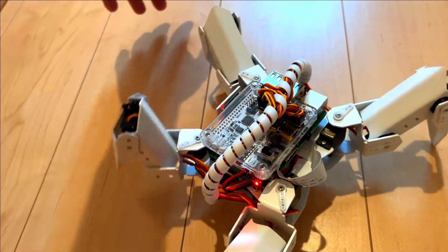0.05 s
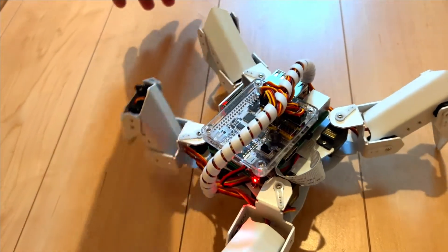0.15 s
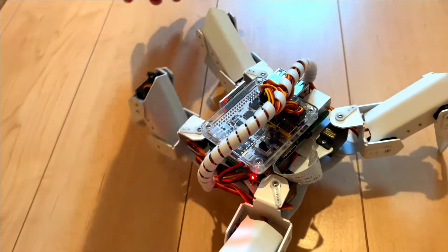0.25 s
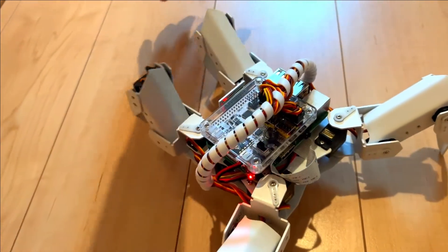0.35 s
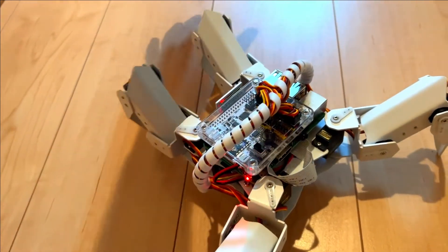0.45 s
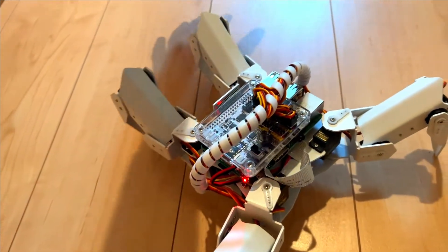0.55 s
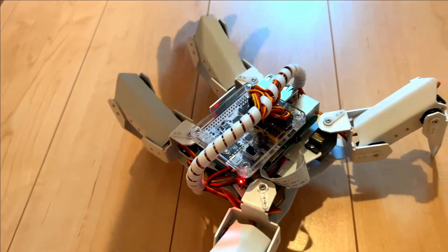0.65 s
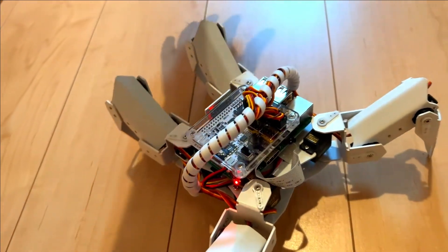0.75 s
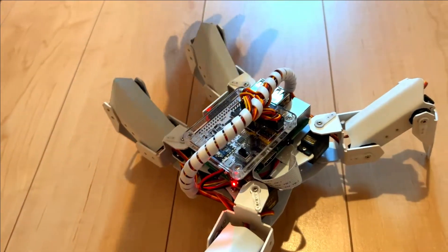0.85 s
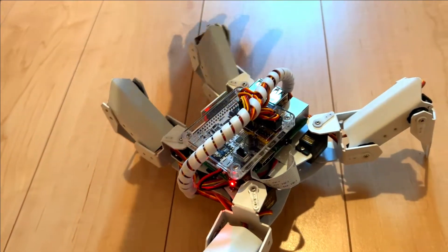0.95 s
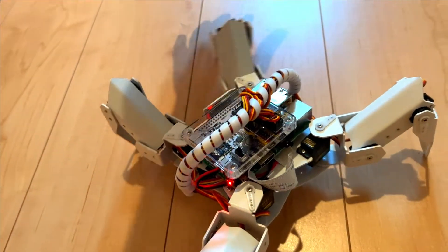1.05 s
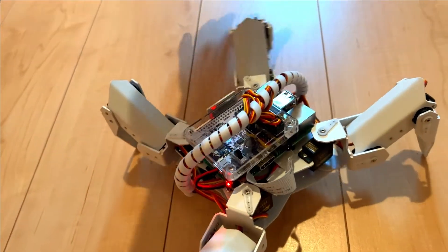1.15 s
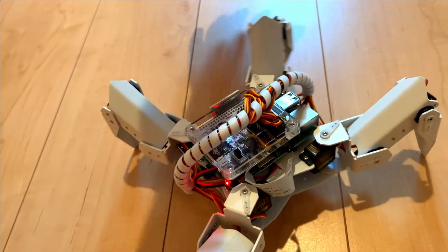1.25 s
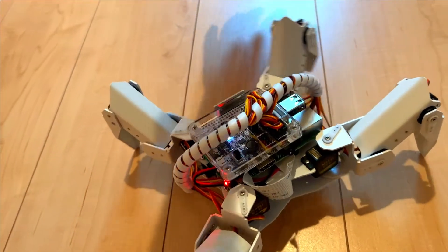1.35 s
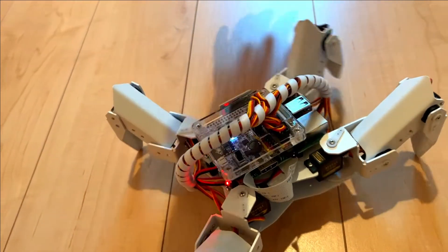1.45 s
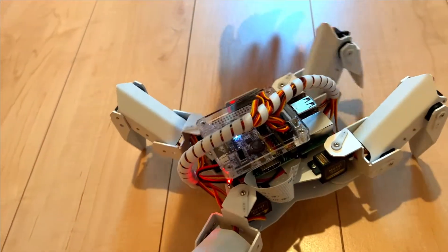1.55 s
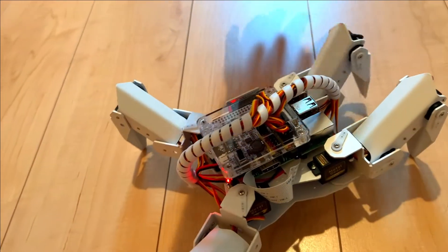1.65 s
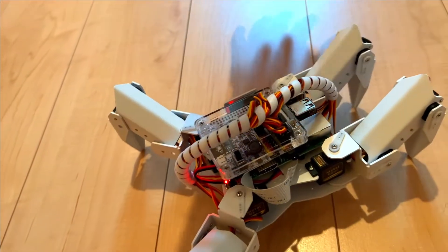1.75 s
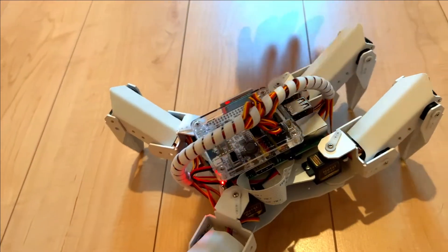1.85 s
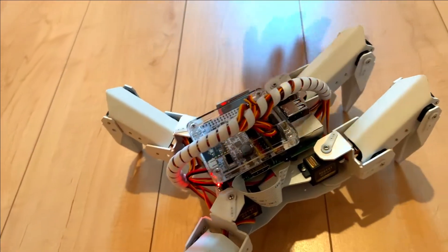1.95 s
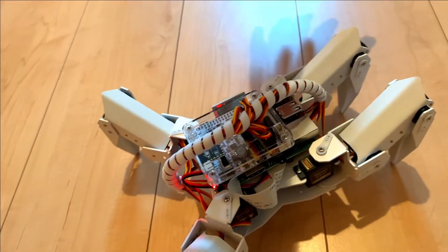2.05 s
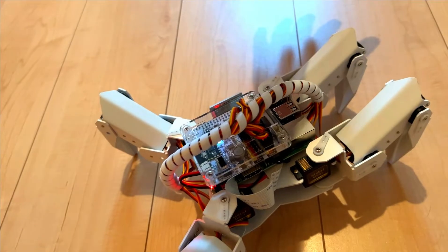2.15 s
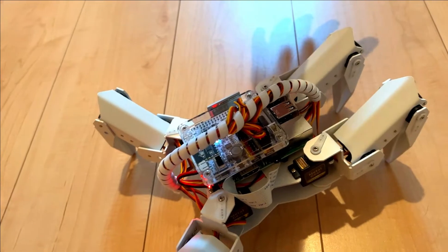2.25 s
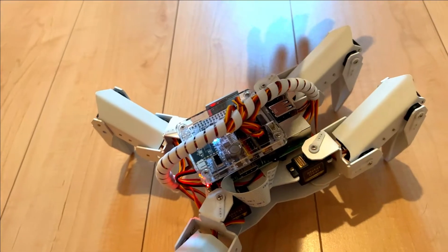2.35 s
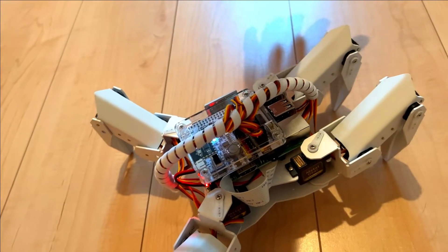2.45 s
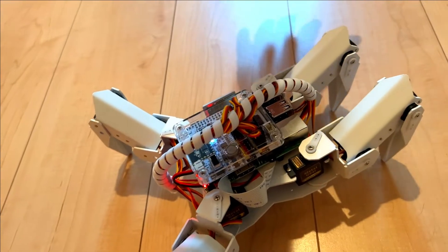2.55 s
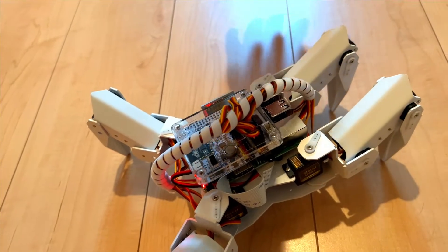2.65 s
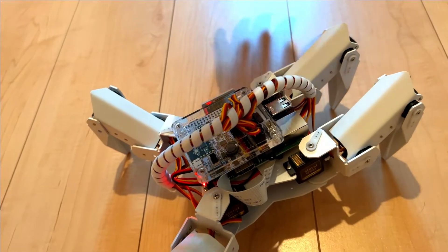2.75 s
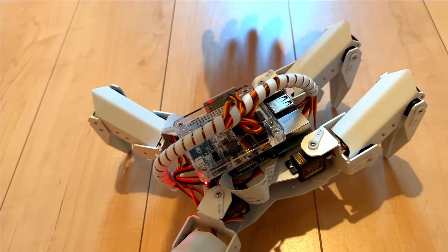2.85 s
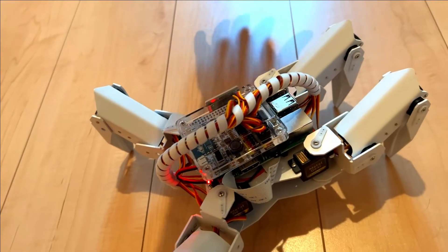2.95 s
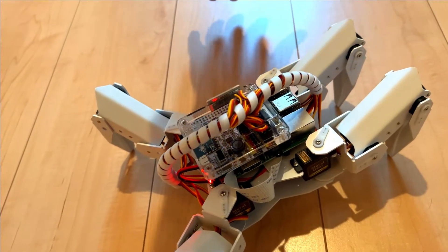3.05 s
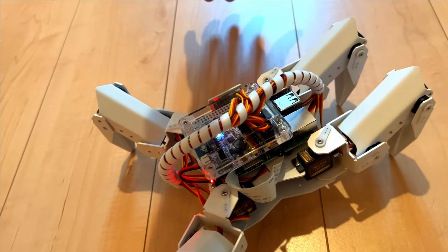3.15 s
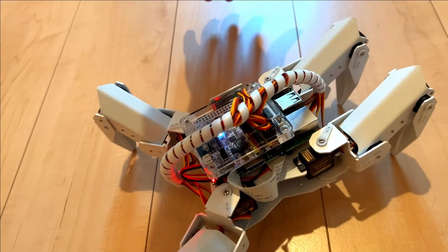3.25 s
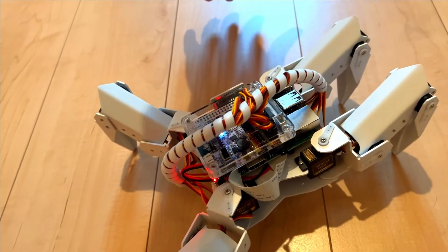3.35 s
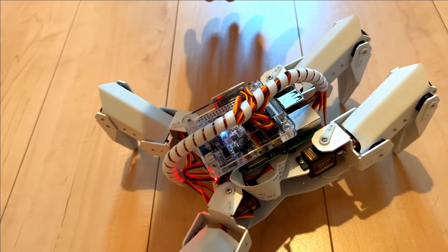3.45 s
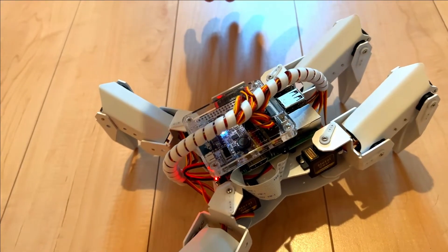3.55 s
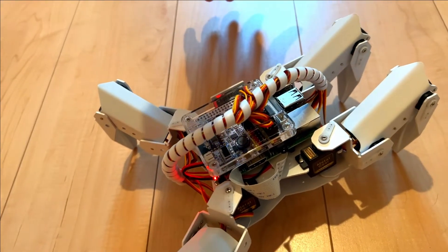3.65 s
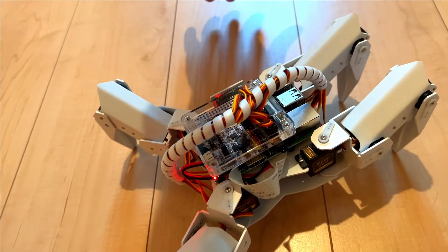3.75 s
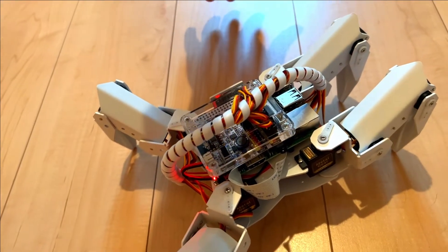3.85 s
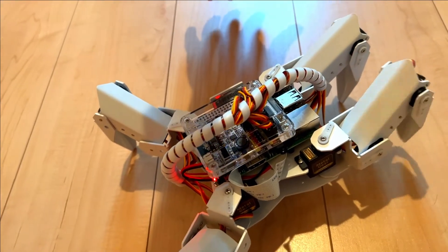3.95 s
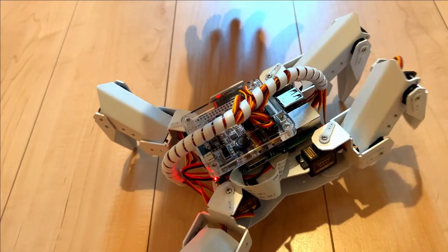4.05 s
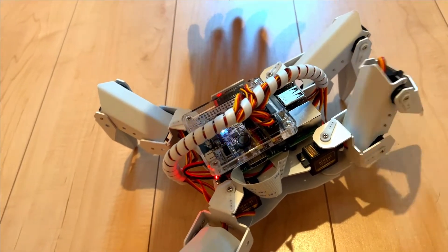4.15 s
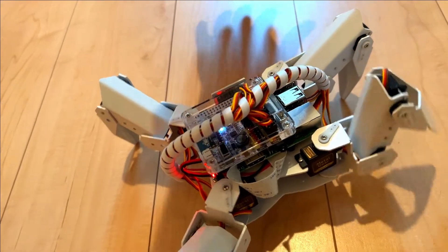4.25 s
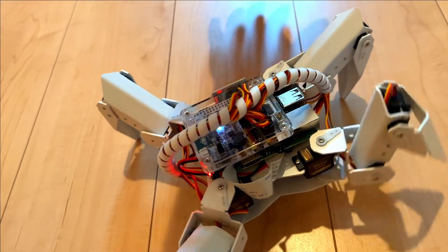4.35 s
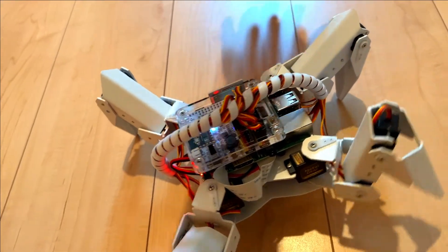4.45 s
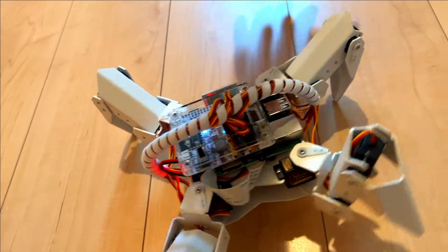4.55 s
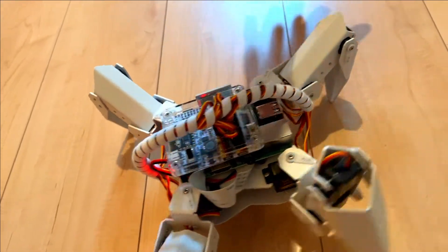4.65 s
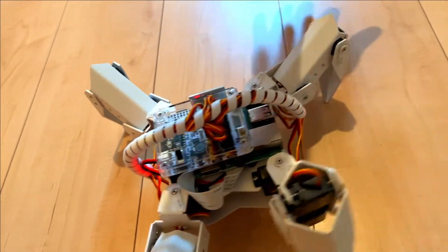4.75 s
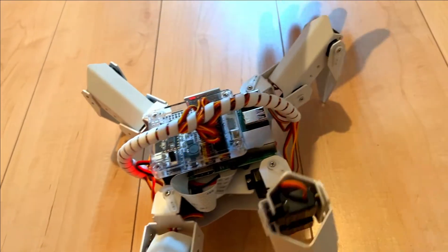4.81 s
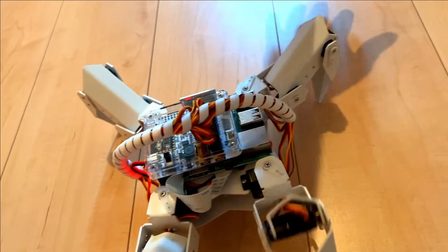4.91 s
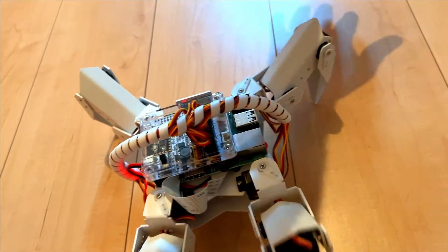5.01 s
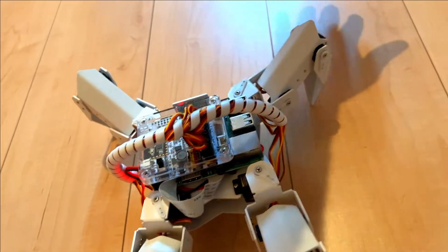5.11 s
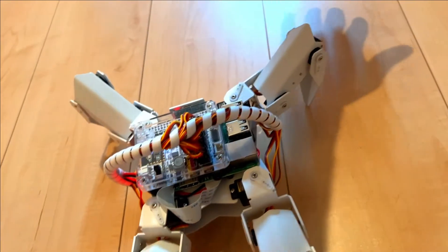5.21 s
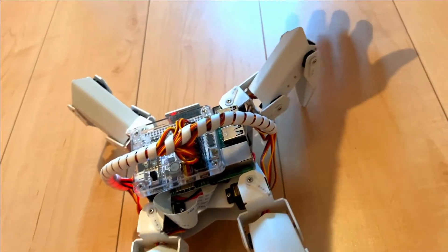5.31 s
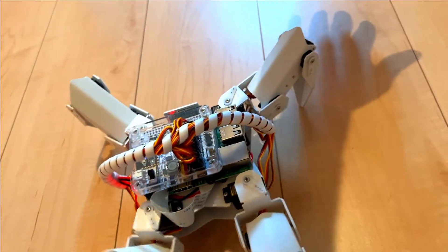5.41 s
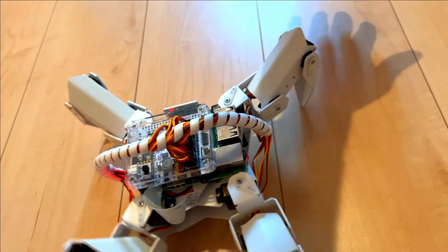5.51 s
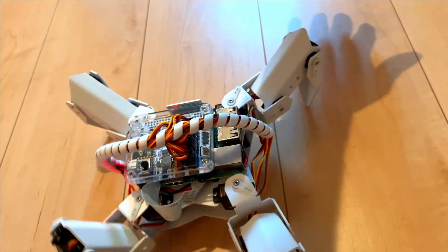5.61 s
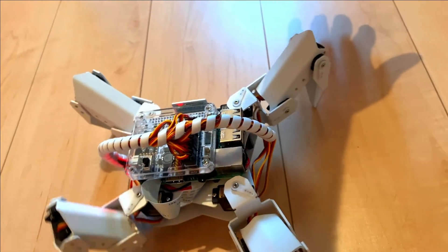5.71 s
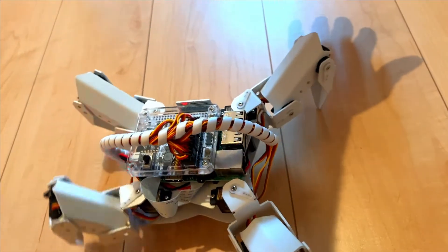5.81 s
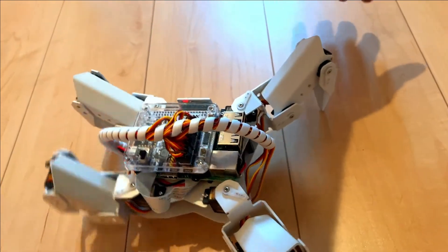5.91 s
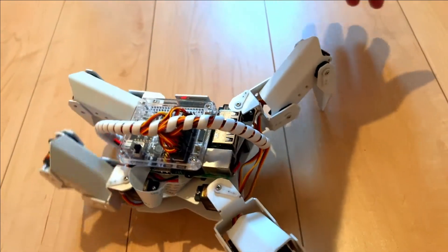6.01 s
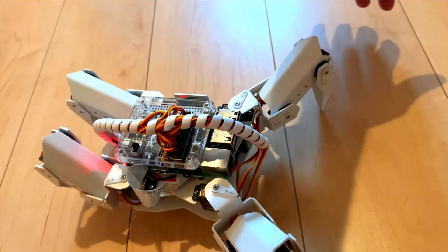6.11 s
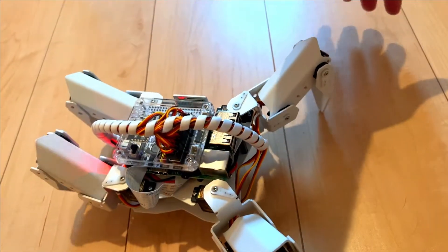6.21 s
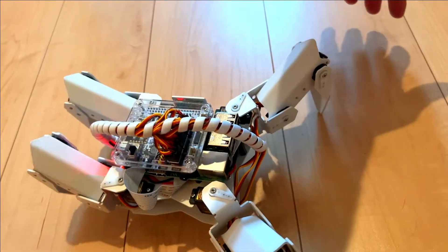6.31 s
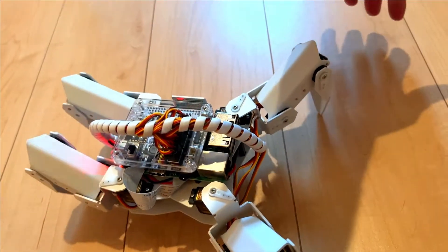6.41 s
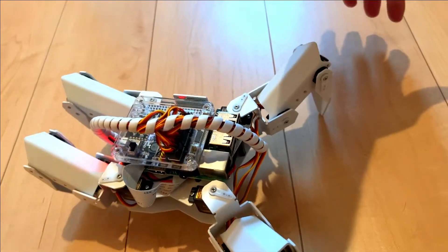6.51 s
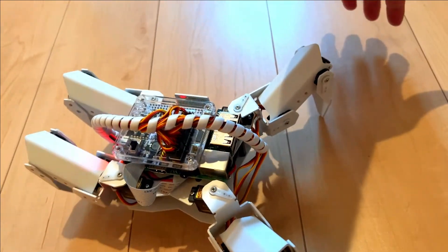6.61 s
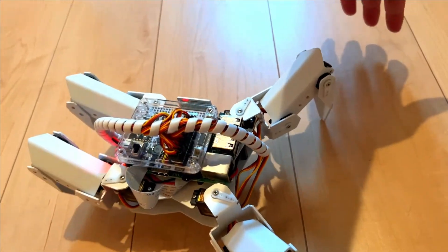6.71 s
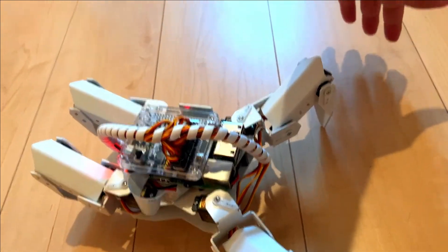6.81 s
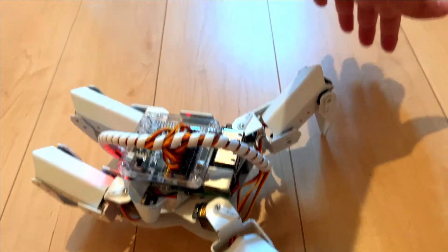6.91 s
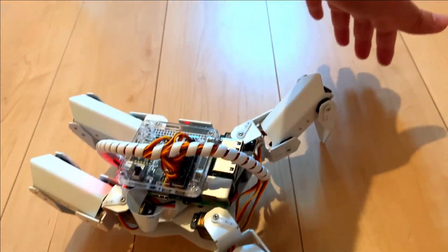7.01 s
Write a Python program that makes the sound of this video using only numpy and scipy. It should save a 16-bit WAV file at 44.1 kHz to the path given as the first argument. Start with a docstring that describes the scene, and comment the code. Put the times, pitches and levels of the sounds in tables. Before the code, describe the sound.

A small four-legged robot walks on a wooden floor in two bursts of rasping, squealing servos and hard plastic foot knocks, with a quiet pause between.

```python
"""Small walking robot

A four-legged robot takes two strides on a wooden floor, with a rest between them.
Servo gears rasp, tick and squeal: random tooth impacts ring in case resonances, tones scatter in pitch.
The frame shudders as filtered patter; plastic feet knock on the boards as decaying modes and noise bursts.
Holding servos whine as beating sines; a quiet living room adds coloured noise and echoes."""
import sys
import numpy as np
from scipy import signal
from scipy.fft import rfft, irfft, next_fast_len
from scipy.io import wavfile
from scipy.ndimage import uniform_filter1d, map_coordinates

SR = 44100
rng = np.random.default_rng(int(sys.argv[2]) if len(sys.argv) > 2 else 0)


def int16_out(signal):
    """Quantize to a 16-bit WAV file."""
    q = np.round(np.clip(np.atleast_2d(signal).T, -1, 1) * 32767)
    wavfile.write(sys.argv[1], SR, q.astype(np.int16))


N = 311787
TIME = np.arange(N) / SR


def from_db(db):
    """Decibels to amplitude gain."""
    return np.exp(np.asarray(db) * (np.log(10) / 20))


def rms_one(x):
    """Scale to unit power."""
    return x / np.sqrt(np.mean(x ** 2) + 1e-20)


def at_hz(points, hz, axis=1):
    """Read a table column, interpolated over log frequency."""
    table = np.array(points)
    return np.interp(np.log(np.maximum(hz, 1)), np.log(table[:, 0]), table[:, axis])


def drift(rate_hz, size=N):
    """Smooth random curve of rms 1 that changes about rate_hz times a second."""
    knots = np.clip(rng.standard_normal(N // 32), -2, 2)
    coarse_s = TIME[:size:16]
    curve = map_coordinates(knots, [coarse_s * rate_hz], order=3, mode="wrap")
    return np.interp(TIME[:size], coarse_s, rms_one(curve))


def add(track, start_s, sound):
    """Mix a sound into a track at a time."""
    start = max(round(start_s * SR), 0)
    track[:, start:start + sound.shape[-1]] += sound[..., :N - start]


# Stereo likeness. Each row: frequency in Hz, left-right correlation (limited where it is read).
LIKENESS = [(30, .9), (250, 0.87), (600, 0.47), (2000, 0.38), (4300, 0.44), (5400, -0.074), (7500, 1),
            (10000, -1.96), (13500, 1), (15500, -.3)]


def likeness(hz):
    """Left-right correlation at a frequency, short of full agreement or opposition."""
    return np.clip(at_hz(LIKENESS, hz), -.98, .98)


def coloured(pair, spectrum):
    """Two unrelated signals become left and right with this spectrum, falling steeply beyond its ends; rms 1."""
    length = pair.shape[-1]
    size = next_fast_len(length, real=True)
    hz = np.fft.rfftfreq(size, 1 / SR) + 1
    low_hz, high_hz = spectrum[0][0], spectrum[-1][0]
    skirts = 1 / np.sqrt((1 + (low_hz / hz) ** 8) * (1 + (hz / high_hz) ** 8))
    mid, side = rfft(pair, size) * from_db(at_hz(spectrum, hz)) * skirts
    alike = likeness(hz)
    sides = np.sqrt(1 + alike) * mid + np.sqrt(1 - alike) * side * [[1], [-1]]
    return rms_one(irfft(sides, size)[:, :length])


def grains(per_s, spread_db):
    """Random tiny impacts of uneven size and either sign; rms 1."""
    sizes = from_db(spread_db * np.minimum(rng.exponential(1, N), 4))
    signed = sizes * rng.choice([-1, 1], N)
    return rms_one(signed * (rng.random(N) < per_s / SR))


def rattled(clicks, t60_s):
    """Clicks ring in a shell with many close modes (decaying noise), heard along two paths; rms 1."""
    t = TIME[:SR // 8]
    shell = rng.standard_normal((2, len(t))) * from_db(-60 * t / t60_s)
    return rms_one(signal.fftconvolve(clicks[None], shell)[:, :N])


def snap(spectrum, t60_s):
    """A hard plastic contact: a burst of dense modes, as coloured noise, that dies at once."""
    t = TIME[:SR // 8]
    return coloured(rng.standard_normal((2, len(t))), spectrum) * from_db(-60 * t / t60_s)


def strokes(rows, attack_s, fall_db_per_s):
    """Summed power of movements: each rises quickly, changes steadily with the load, then dies away freely."""
    t, power = TIME[::32], 0
    for start_s, end_s, start_db, end_db in rows:
        fall_db = fall_db_per_s * np.maximum(t - end_s, 0)
        db = np.interp(t, [start_s, end_s], [start_db, end_db]) - fall_db
        rise = np.clip((t - start_s) / attack_s, 0, 1)
        power = power + (rise * from_db(db)) ** 2
    return np.interp(TIME, t, power)


# Still room. Each row: frequency in Hz, relative level in dB per Hz.
AIR_COLOUR = [(13, -47.5), (22, -14), (86, 0), (153, -11.5), (301, -14.5), (325, -20.5), (368, -13),
              (524, -27), (609, -16.5), (727, -33.5), (1230, -32), (1510, -35.5), (2040, -39),
              (9000, -48.5), (11700, -89.5), (19800, -120)]


def room_air(level_db=-63):
    """The still room: steady coloured noise."""
    return from_db(level_db) * coloured(rng.standard_normal((2, N)), AIR_COLOUR)


# Two holding servo drivers. Each row: frequency in Hz, level in dB, phase between the sides in radians.
WHINE = [(15612, -57, 1.8), (15631, -49.5, 2.1)]
DRIVE_HZ, DRIVE_DB, DRIVE_APART_RAD = 15570, -55.5, 1.8  # third driver, only while the legs move


def whine(effort, wander_hz=1.5, strain_hz=24.0, waver_db=0.9, shake_db=2.0, moving_db=-60):
    """The holding servos beat against each other; pitch and level are shaken while the legs move."""
    moving = np.clip(effort / from_db(moving_db), 0, 1)
    voices = [(hz, from_db(db), apart_rad) for hz, db, apart_rad in WHINE]
    voices.append((DRIVE_HZ, from_db(DRIVE_DB) * moving, DRIVE_APART_RAD))
    out = np.zeros((2, N))
    for hz, gain, apart_rad in voices:
        pitch_hz = hz + wander_hz * drift(8) + strain_hz * moving * drift(400)
        phase = 2 * np.pi * np.cumsum(pitch_hz) / SR
        unsteady = from_db(waver_db * drift(5) + shake_db * moving * drift(250))
        out += gain * unsteady * np.sin(phase + np.array([[apart_rad], [0]]))
    return out


# Servo moves. Each row: start in seconds, end in seconds, relative rasp at the start in dB,
# relative rasp at the end in dB, upper treble against the lower in dB.
MOVES = [(-0.03, 0.35, -47.5, -50, -2.5), (0.365, 0.523, -48.5, -47.5, 1.5), (0.553, 0.625, -51, -48, -12),
         (0.627, 0.76, -46.5, -44.5, -6), (0.853, 1.228, -45.5, -49.5, -1), (1.27, 1.561, -46.5, -46, -1),
         (1.665, 1.856, -43, -45, -2), (3.881, 4.174, -48, -45.5, -2.5), (4.192, 4.822, -53, -48.5, 0),
         (4.867, 5.07, -49.5, -47, -2), (5.118, 5.42, -48.5, -52, -1), (5.435, 5.564, -47, -46.5, 1.5),
         (5.588, 5.953, -53, -43.5, 1), (6.1, 6.298, -67, -58, -13), (6.275, 6.485, -54, -56, -12),
         (6.498, 6.554, -50.5, -58, -6)]
SPIN_UP_S = 0.032
COAST_DB_PER_S, TREBLE_COAST_DB_PER_S = 104.5, 126.5  # the rasp dulls as the motor runs down


def motion():
    """Gain of the rasp and of its upper treble over all servo moves."""
    rasp = [move[:4] for move in MOVES]
    treble = [(start_s, end_s, start_db + bright_db, end_db + bright_db)
              for start_s, end_s, start_db, end_db, bright_db in MOVES]
    rasp_power = strokes(rasp, SPIN_UP_S, COAST_DB_PER_S)
    treble_power = strokes(treble, SPIN_UP_S, TREBLE_COAST_DB_PER_S)
    return np.sqrt(rasp_power), np.sqrt(treble_power)


# Servo case resonances. Each row: frequency in Hz, width in Hz, relative level in dB.
CASE = [(3436, 180, -6.5), (4040, 130, -8.5), (4400, 90, -6), (4717, 100, -2), (5050, 170, -0.5),
        (5514, 170, 2), (5980, 110, 0.5), (6450, 50, -3.5), (6940, 240, -4.5), (7530, 200, -5),
        (8056, 200, 4), (8600, 110, 4), (8900, 77, -1), (10890, 220, -11), (11334, 300, 3),
        (12100, 570, -1), (14100, 470, -2)]


def case_ring(drive, shift_db, shift_rate_hz):
    """Case resonances answer a drive; as the wheels turn, the contact favours now one, now another; rms 1."""
    out = 0
    for hz, width_hz, db in CASE:
        r = np.exp(-np.pi * width_hz / SR)
        poles = [1, -2 * r * np.cos(2 * np.pi * hz / SR), r * r]
        ringing = signal.lfilter([1, 0, -1], poles, drive * from_db(shift_db * drift(shift_rate_hz)))
        alike = likeness(hz)
        weights = np.sqrt([[1 + alike], [1 - alike]])
        out = out + ringing * (from_db(db) * weights / ringing.std())
    mid, side = out
    return rms_one(np.array([mid + side, mid - side]))


# Gear noise through the cases. Each row: frequency in Hz, relative level in dB per Hz.
GEAR_COLOUR = [(300, -11), (900, -14.5), (1700, -16), (2300, -10.5), (2700, -9.5), (3500, -6), (4400, -3.5),
               (5300, 0), (6600, -2), (8000, -1.5), (9300, -6), (11000, -7), (14000, -5), (16000, -9)]


def gears(effort, treble, rasp_db=-5.0, ring_db=-6.0, split_hz=6300,
          turn_hz=20.0, turn_db=1.0, flutter_db=1.2, mesh_hz=240, mesh_depth=0.15):
    """Teeth collide thousands of times a second, harder on each turn of the motor and of an uneven wheel."""
    wheel = np.sin(2 * np.pi * np.cumsum(turn_hz * (1 + 0.062 * drift(3.8))) / SR)
    motor = np.sin(2 * np.pi * np.cumsum(mesh_hz * (1 + .2 * drift(5.4))) / SR)
    force = from_db(turn_db * wheel + flutter_db * drift(130)) * (1 + mesh_depth * motor)
    teeth = force * np.array([grains(per_s=5000, spread_db=-1.0) for side in range(2)])
    rasp = from_db(rasp_db) * coloured(teeth, GEAR_COLOUR)
    rasp = rasp + from_db(ring_db) * case_ring(teeth, shift_db=5.0, shift_rate_hz=45.0)
    top = signal.sosfiltfilt(signal.butter(2, split_hz, "high", fs=SR, output="sos"), rasp)
    return effort * (rasp - top) + treble * top


# Leg swings. Each row: start in seconds, end in seconds, rumble at the start in dB, rumble at the end in dB.
SWINGS = [(-0.03, 0.34, -41.5, -50), (0.997, 1.142, -51, -50), (1.353, 1.62, -45, -38),
          (4.227, 4.29, -44, -44), (4.37, 4.733, -45.5, -46.5), (4.808, 4.865, -48, -50),
          (5.608, 5.782, -50.5, -49), (6.555, 6.62, -42, -50.5)]
SHAKE_UP_S, SETTLE_DB_PER_S = 0.027, 202.5
SWING_SCRAPE_DB = -18  # against the rumble of the swing
ROCK_RUMBLE_DB, ROCK_SCRAPE_DB = -8.5, -17.5  # against the knock of the landing
ROCK_UP_S, ROCK_DB_PER_S = 0.05, 105
HUM_DB = -13.5  # against the effort gain
# Low board modes, scraping feet, motor hum. Each row: frequency in Hz, relative level in dB per Hz.
RUMBLE_COLOUR = [(115, -23), (145, -8), (166, 2.5), (187, -7), (208, 5), (235, -7), (270, -10.5), (300, -8),
                 (360, -12), (415, -7), (470, -16), (520, -29), (620, -31)]
SCRAPE_COLOUR = [(310, -31), (520, -8), (595, -10.5), (699, -7.5), (772, -18), (985, -8), (1150, -13),
                 (1800, -27.5), (2340, -47.5), (3960, -120)]
HUM_COLOUR = [(140, -6.5), (200, -2), (270, -5.5), (380, 2), (470, -9.5), (600, -15.5), (1000, -17.5),
              (1700, -24)]


def shudder(effort, even_s=0.051):
    """Leg swings and rocking after landings patter on the boards' low modes; the motors hum beneath."""
    swinging = strokes(SWINGS, SHAKE_UP_S, SETTLE_DB_PER_S)
    landings = [(s, s, knock_db, knock_db) for s, _, knock_db, *_ in STEPS]
    rocking = strokes(landings, ROCK_UP_S, ROCK_DB_PER_S)
    rumble = swinging + rocking * from_db(ROCK_RUMBLE_DB) ** 2
    scrape = swinging * from_db(SWING_SCRAPE_DB) ** 2 + rocking * from_db(ROCK_SCRAPE_DB) ** 2
    hum = (effort * from_db(HUM_DB)) ** 2
    slips = rattled(grains(per_s=700, spread_db=0.5), t60_s=0.0039)
    out = 0
    for colour, power in ((RUMBLE_COLOUR, rumble), (SCRAPE_COLOUR, scrape), (HUM_COLOUR, hum)):
        patter = coloured(slips + rng.standard_normal((2, N)), colour)
        # divide out the patter's own slow swells, so its level follows the movement
        local_power = uniform_filter1d(np.mean(patter ** 2, axis=0), int(even_s * SR) + 1)
        out = out + patter * np.sqrt(power / local_power)
    return out


# Landings. Each row: time in seconds, thump in dB, knock in dB, clack in dB, crack in dB,
# pitch of the leg's clack in Hz, rattle of the frame in dB.
STEPS = [(0.309, -37.5, -39.5, -45, -65, 950, -58), (0.692, -27.5, -26.5, -32.5, -26, 1100, -38),
         (0.707, -20, -35, -32, -39, 1000, -42.5), (0.994, -33.5, -48.5, -68, -62, 1000, -70),
         (1.7779, -33, -24, -22.5, -30, 1300, -29.5), (1.889, -44, -38, -34, -57, 750, -42),
         (4.252, -53, -38.5, -49, -55, 1000, -52), (5.2005, -26, -25.5, -18, -20, 1010, -27),
         (5.940, -43.5, -26.5, -20.5, -34, 1030, -35), (6.305, -23, -28.5, -36.5, -37, 1300, -36.5),
         (6.372, -37.5, -33, -49, -55, 1100, -52), (6.554, -33, -42, -52, -51, 807, -58.5)]
# Floorboard and frame modes. Each row: frequency in Hz, relative level in dB, t60 in seconds.
BOARD = [(166.5, -2, 0.17), (209.9, 1, 0.19), (245.4, -3.5, 0.078), (293.3, -8.5, 0.19), (335.3, -5, 0.13),
         (379.8, -1.5, 0.081), (419.5, -2.5, 0.063), (458.5, -10.5, 0.098), (595, -8, 0.05),
         (701, -9, 0.029), (887, -8, 0.033), (951, -2.5, 0.031), (1084, 0, 0.027), (1210, -11, 0.027),
         (1459, -10.5, 0.028), (1485, -13.5, 0.033), (1857, -8.5, 0.027)]
CLACK_PHASE_RAD = 0.6


def footfalls(thump_hz=220, knock_hz=420, above_db=-9.0, rise_s=0.0011,
              low_pan_db=1.3, high_pan_db=0.5, low_cut_hz=135):
    """Each foot sets the board ringing; every landing has its own thump, knock and clack levels."""
    out, t = np.zeros((2, N)), TIME[:SR // 2]
    hz, mode_db, t60_s = np.transpose(BOARD)[:, :, None]
    sides = np.array([1, -1])[:, None, None]
    signs = -(-1) ** (np.arange(len(BOARD))[:, None] // 2)
    for s, thump_db, knock_db, clack_db, _, clack_hz, _ in STEPS:
        anchors = np.log([thump_hz, knock_hz, clack_hz, 2 * clack_hz])
        pan = from_db(sides * np.interp(np.log(hz), anchors, [low_pan_db, 0, high_pan_db, 0]))
        blow_db = np.interp(np.log(hz), anchors, [thump_db, knock_db, clack_db, clack_db + above_db])
        strength = from_db(blow_db + mode_db)
        # the upper modes reach the two sides out of step
        phase = 2 * np.pi * hz * t + sides * CLACK_PHASE_RAD * np.minimum(hz / clack_hz, 1)
        modes = signs * strength * pan * from_db(-60 * t / t60_s) * np.sin(phase)
        add(out, s, modes.sum(axis=1) * (1 - np.exp(-t / rise_s)))
    # high-pass: keep the summed modes free of deep bass
    return signal.sosfilt(signal.butter(3, low_cut_hz, "high", fs=SR, output="sos"), out)


# Foot crack and loose plastic frame. Each row: frequency in Hz, relative level in dB per Hz.
CRACK_COLOUR = [(1200, -10), (2000, -3.5), (2700, -3), (3500, 4.5), (4300, 1.5), (5500, -8), (8000, -4),
                (12000, -1.5), (16000, -10)]
RATTLE_COLOUR = [(300, -2.5), (450, 0), (540, -1), (660, 3.5), (800, -2.5), (950, 0), (1150, -3),
                 (1350, -1.5), (1700, -15), (2400, -15)]


def clatter(crack_t60_s=0.027, rattle_t60_s=.13, rise_s=0.00077):
    """The plastic foot cracks against the wood; the jolted loose frame rattles on longer."""
    out = np.zeros((2, N))
    for s, *_, crack_db, _, rattle_db in STEPS:
        crack = from_db(crack_db) * snap(CRACK_COLOUR, crack_t60_s)
        rattle = from_db(rattle_db) * snap(RATTLE_COLOUR, rattle_t60_s)
        burst = crack + rattle
        add(out, s, burst * (1 - np.exp(-TIME[:burst.shape[-1]] / rise_s)))
    return out


# Gear squeals, a low raspy band and faint whines after the moves. Each row: start in seconds,
# end in seconds, pitch in Hz, pitch scatter in Hz, level in dB before the common trim.
SQUEALS = [(0.38, 0.55, 5390, 129, -49.5), (0.872, 0.965, 8800, 160, -51), (0.952, 1.53, 5190, 83, -56),
           (0.976, 1.348, 7600, 200, -53), (1.356, 1.55, 8800, 220, -53),
           (1.612, 1.916, 4445, 160.7, -51.5), (1.90, 2.165, 4550, 110.4, -78),
           (2.269, 2.41, 3950, 101, -81.5), (3.909, 4.608, 2428, 200.7, -67.5),
           (3.909, 4.216, 6030, 235, -59.5), (4.518, 4.817, 5200, 158, -63.5),
           (4.888, 5.082, 4150, 98, -52), (4.93, 5.077, 6030, 76, -61), (5.46, 6.00, 5360, 199.4, -55),
           (5.62, 6.002, 8180, 305, -50), (6.672, 7.051, 3370, 25.05, -91)]


def squeals(trim_db=-1.0, edge_s=0.0247, uneven_db=3, burst_hz=110.0, scatter_rate_hz=260.0, count=3):
    """Gear squeals, raspy band and faint whines: a few sines scatter in pitch and share uneven bursts."""
    out = np.zeros((2, N))
    for start_s, end_s, hz, scatter_hz, db in SQUEALS:
        size = int((end_s - start_s + edge_s) * SR)
        t = TIME[:size]
        gate = np.clip(np.minimum(t, t[::-1]) / edge_s, 0, 1)
        pitches_hz = [hz + scatter_hz * drift(scatter_rate_hz, size) for tone in range(count)]
        phases = 2 * np.pi * np.cumsum(pitches_hz, axis=1) / SR
        bursts = from_db(uneven_db * drift(burst_hz, size))
        # the phase between the sides wanders
        apart_rad = np.arccos(np.clip(at_hz(LIKENESS, hz), -1, 1)) + .5 * drift(20, size)
        tones = np.sin([phases + apart_rad, phases]).sum(axis=1)
        add(out, start_s - edge_s / 2, from_db(db + trim_db) * gate * rms_one(bursts * tones))
    return out


# Jerky servo advances. Each row: first tick in seconds, last tick in seconds, spacing in seconds, level in dB.
TICK_RUNS = [(0.650, 0.670, 0.02, -42), (0.982, 1.272, 0.048, -45), (1.503, 1.564, 0.061, -44),
             (4.330, 4.417, 0.043, -39), (4.502, 4.797, 0.042, -41), (4.980, 5.046, 0.066, -41)]
OFFBEAT_TICK_DB, TICK_SCATTER_DB = -2.0, 1.0  # every second tick; random spread


def ticks(grit_db=-7.5, t60_s=0.053, rise_s=0.0011):
    """Slack in the gear train closes with a brief chatter of teeth that rings in the case."""
    swell, t = np.zeros((1, N)), TIME[:SR // 4]
    shape = from_db(-60 * t / t60_s) * (1 - np.exp(-t / rise_s))
    shape = shape / shape.max()
    for first_s, last_s, spacing_s, db in TICK_RUNS:
        count = round((last_s - first_s) / spacing_s) + 1
        for k, s in enumerate(np.linspace(first_s, last_s, count)):
            tick_db = db + OFFBEAT_TICK_DB * (k % 2) + TICK_SCATTER_DB * rng.standard_normal()
            add(swell, s - rise_s, from_db(tick_db) * shape)
    teeth = rng.standard_normal((2, N))
    ringing = case_ring(teeth, shift_db=9.0, shift_rate_hz=20.0)
    grit = from_db(grit_db) * coloured(teeth, GEAR_COLOUR)
    return swell[0] * rms_one(ringing + grit)


# Room echoes. Each row: frequency in Hz, t60 in seconds, echo level in dB.
ROOM = [(150.3, .45, -10.5), (347.5, .5, -5), (798, .55, -5), (1800, 0.58, 0), (4330, 0.4, -2.5),
        (11900, 0.24, -16.5)]


def room(x, first_s=0.0036):
    """Echoes build up after the first wall and die band by band."""
    t = TIME[:SR]
    edges_hz = 90 * 2 ** np.arange(0, 8.1, 1)
    wash = coloured(rng.standard_normal((2, SR)), [(20, 0), (22000, 0)])
    build_up = np.clip(t / first_s - 1, 0, 1)
    response = 0
    for low_hz, high_hz in zip(edges_hz, np.minimum(edges_hz[1:], .45 * SR)):
        band_filter = signal.butter(2, [low_hz, high_hz], "band", fs=SR, output="sos")
        band = signal.sosfilt(band_filter, wash)
        centre_hz = np.sqrt(low_hz * high_hz)
        decay = from_db(-60 * t / at_hz(ROOM, centre_hz)) * build_up
        gain = from_db(at_hz(ROOM, centre_hz, axis=2))
        response = response + gain * band * decay / np.sqrt(np.sum(decay ** 2))
    return signal.fftconvolve(x, response, axes=1)[:, :N]


def scene():
    """The robot close by, its echoes and the still room."""
    effort, treble = motion()
    servos = gears(effort, treble) + shudder(effort) + squeals() + ticks()
    steps = footfalls() + clatter()
    echoes = room(steps + from_db(-3.5) * servos)
    return room_air() + whine(effort) + servos + steps + echoes


def record(dry, cutoff_hz=16100):
    """A steep elliptic low-pass cuts the top."""
    return signal.sosfilt(signal.ellip(12, .1, 90, cutoff_hz, fs=SR, output="sos"), dry)


dry = scene()
out = record(dry)
int16_out(out)
```